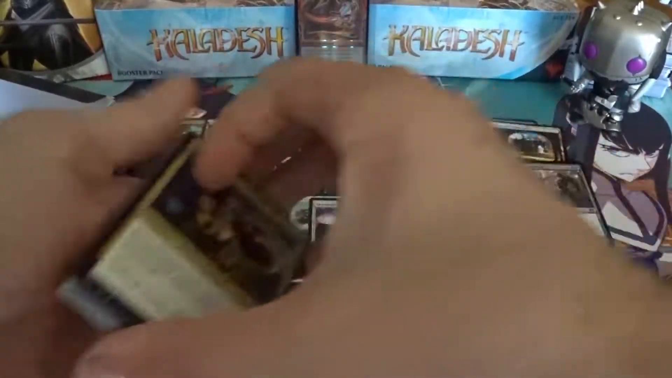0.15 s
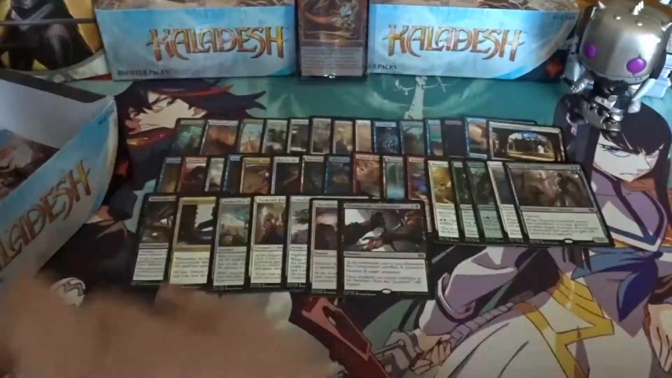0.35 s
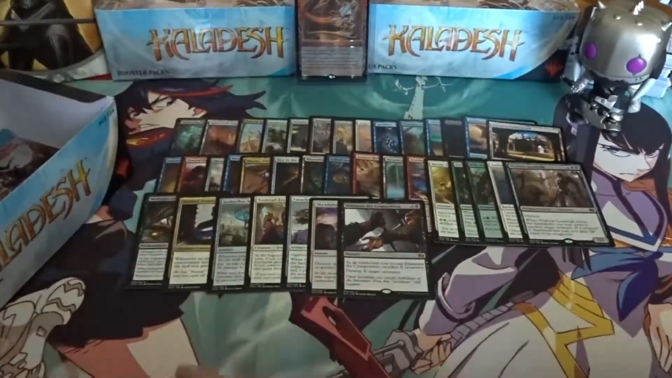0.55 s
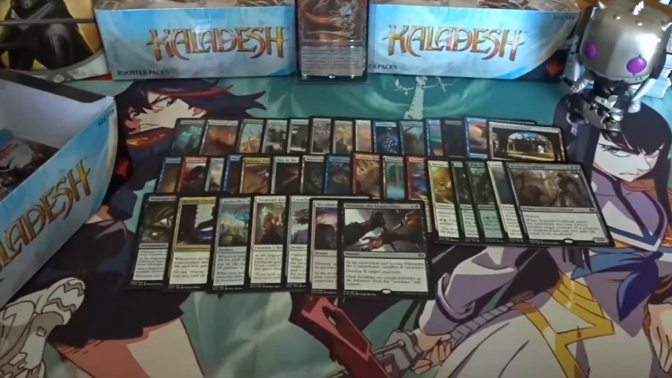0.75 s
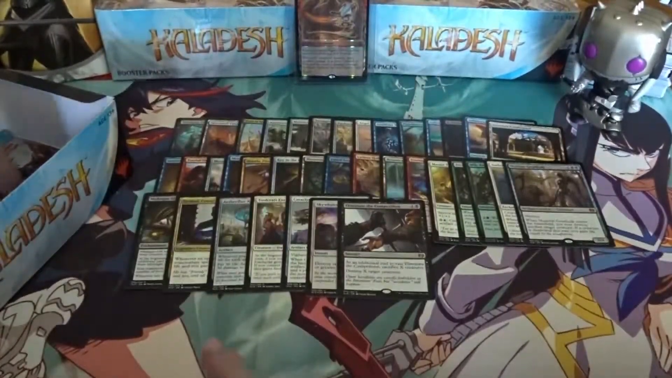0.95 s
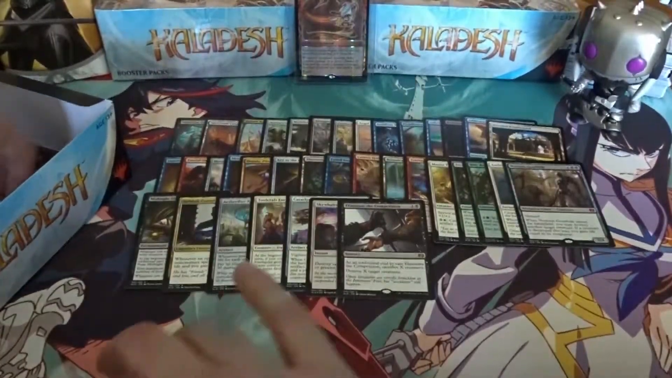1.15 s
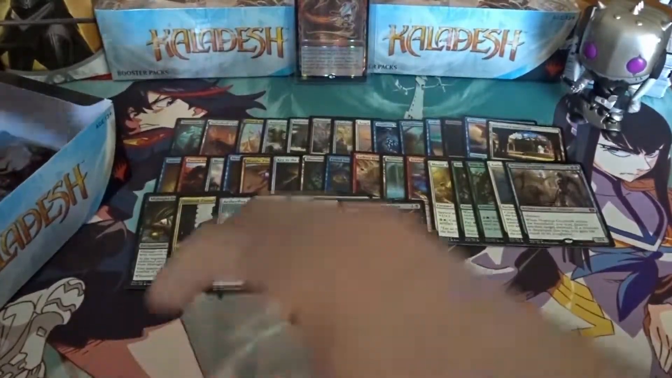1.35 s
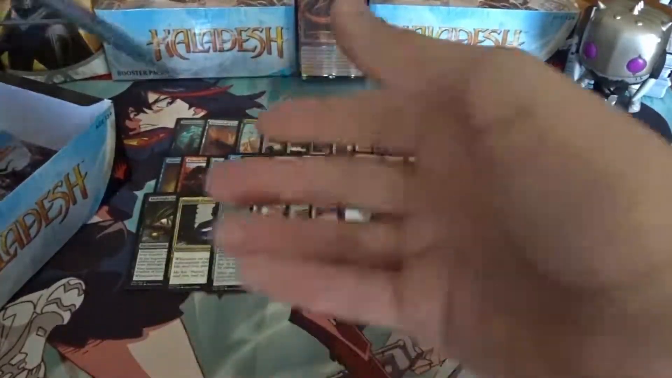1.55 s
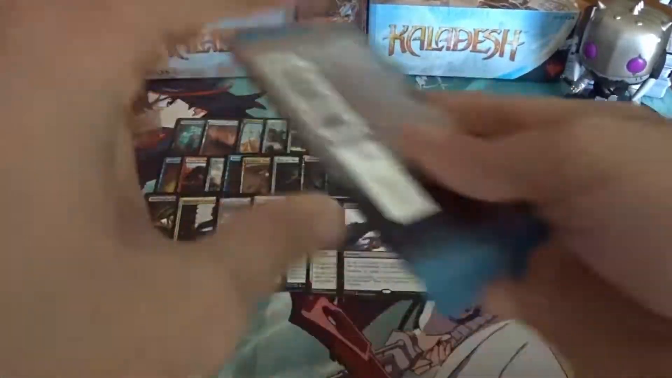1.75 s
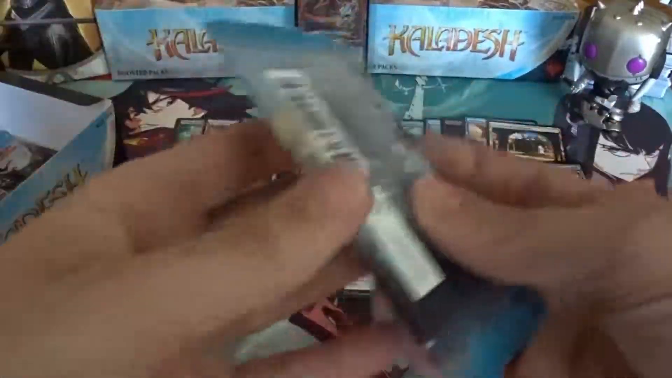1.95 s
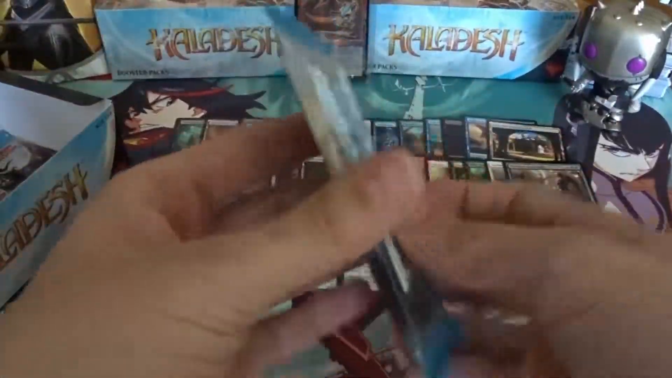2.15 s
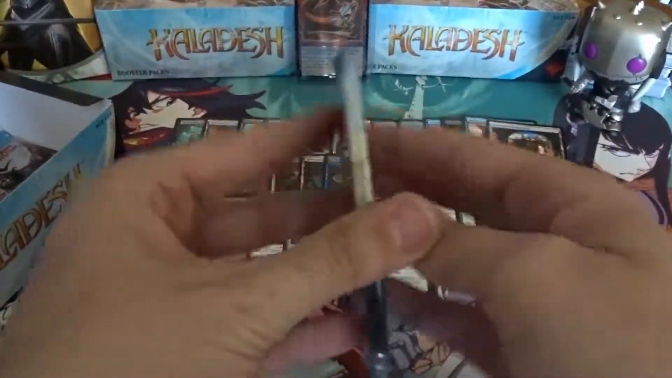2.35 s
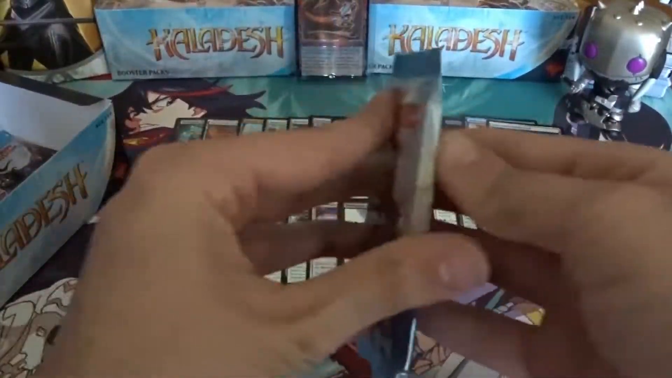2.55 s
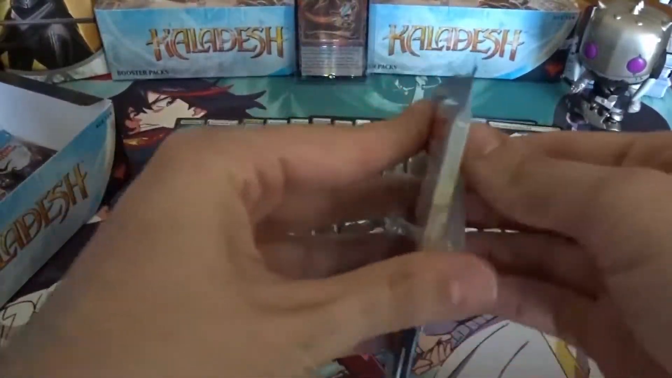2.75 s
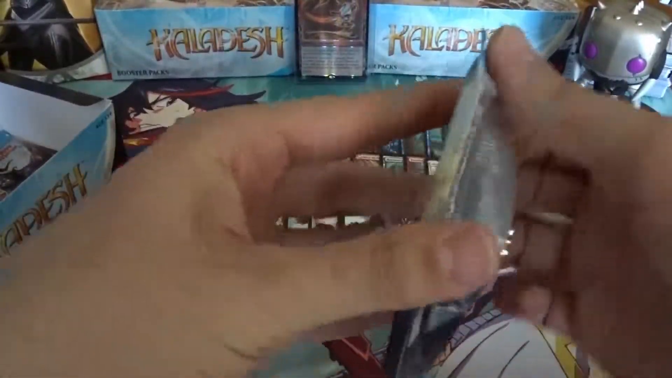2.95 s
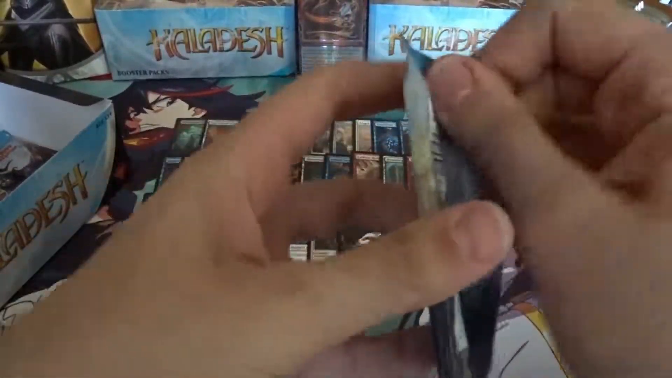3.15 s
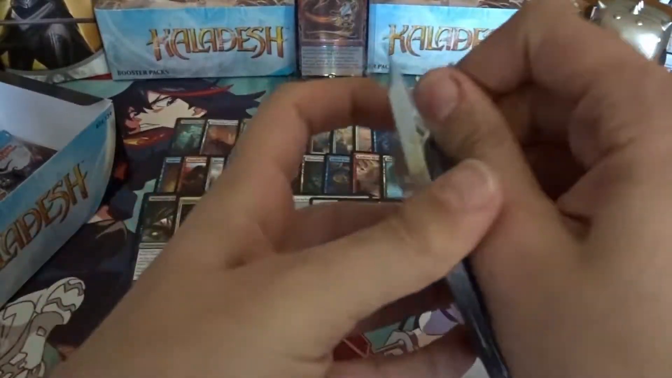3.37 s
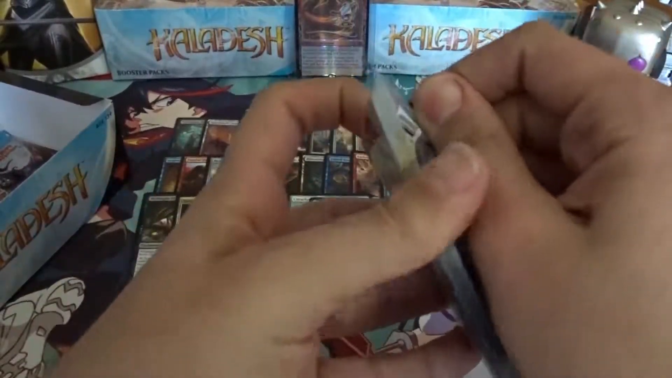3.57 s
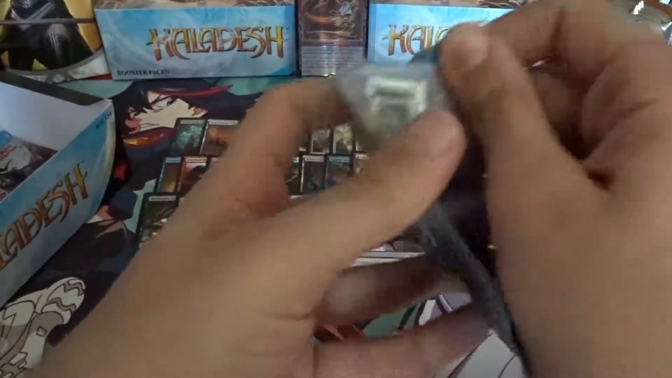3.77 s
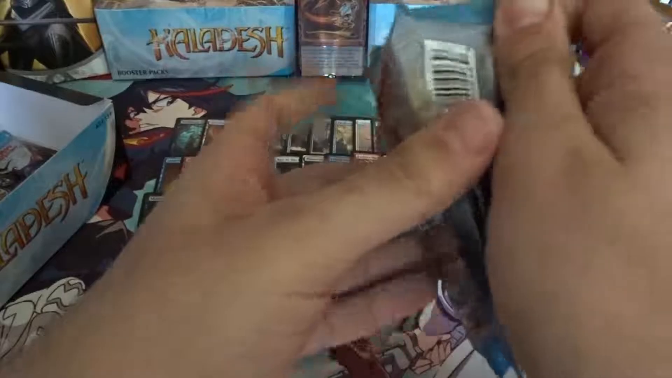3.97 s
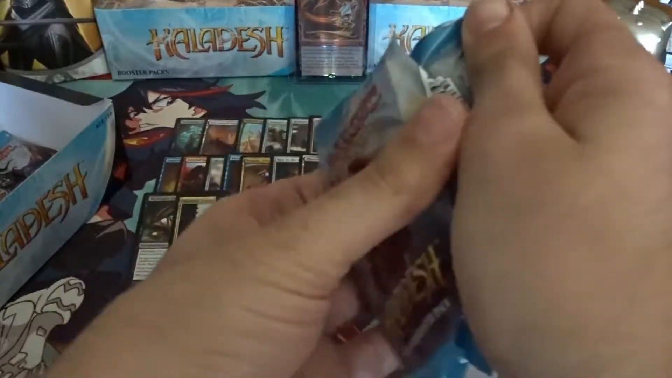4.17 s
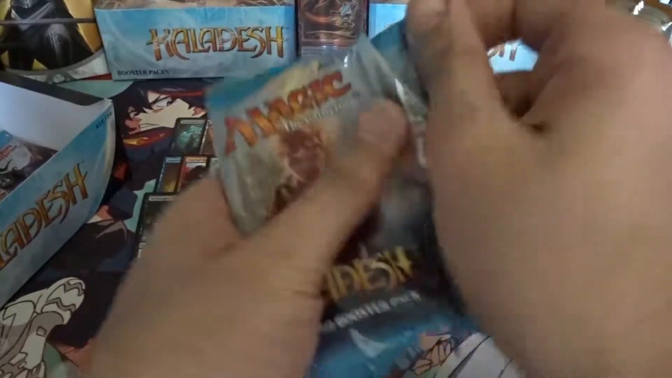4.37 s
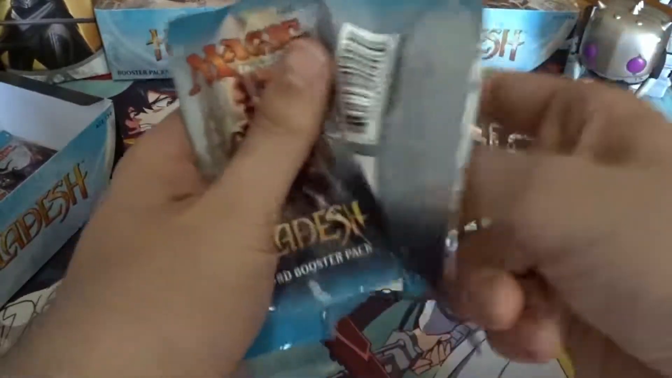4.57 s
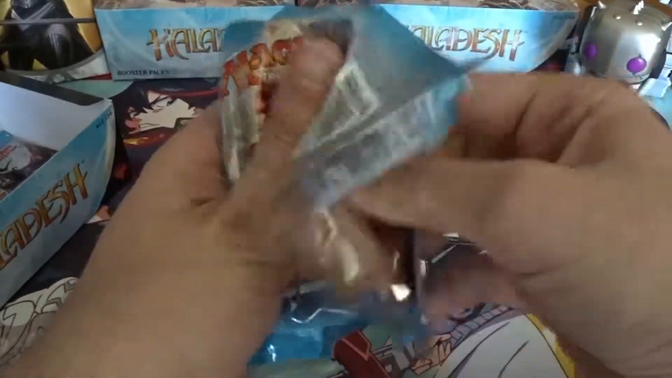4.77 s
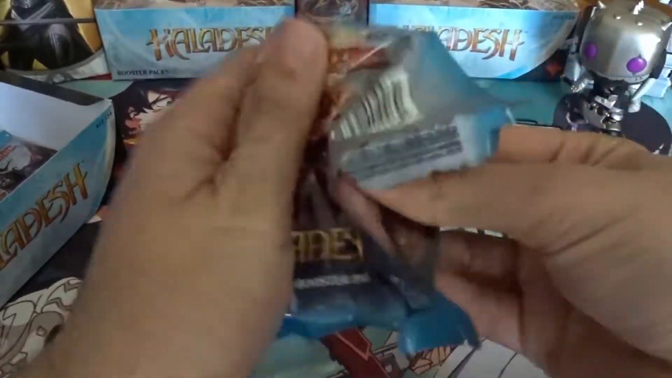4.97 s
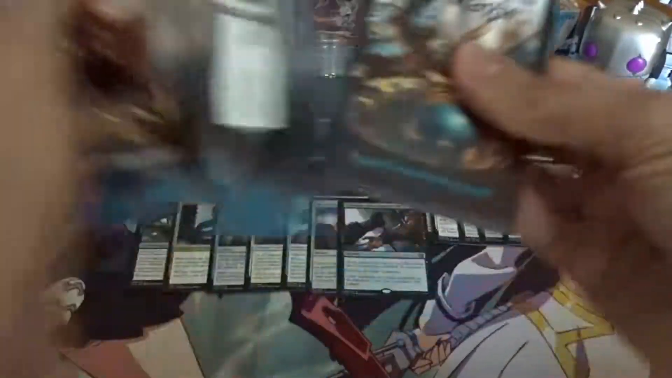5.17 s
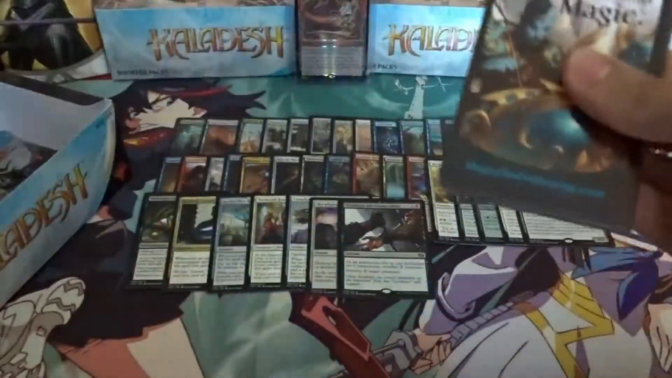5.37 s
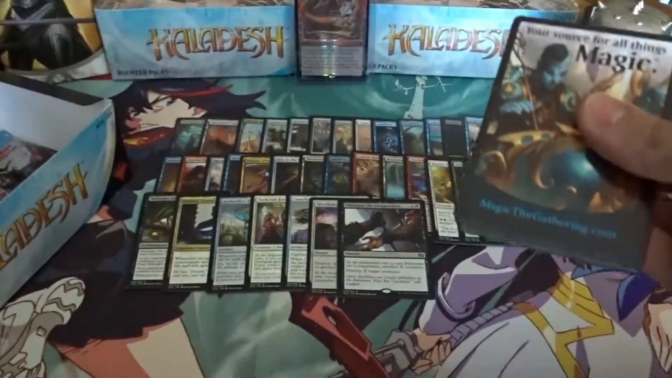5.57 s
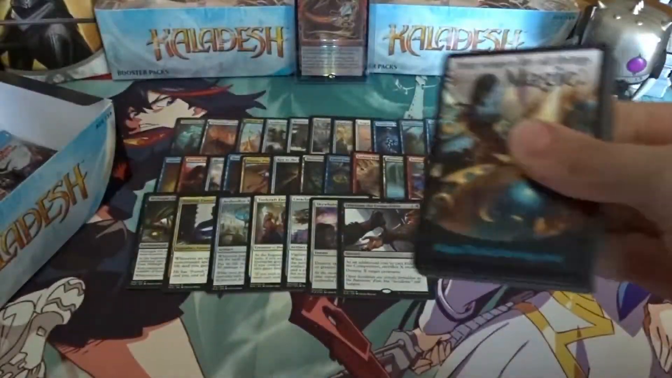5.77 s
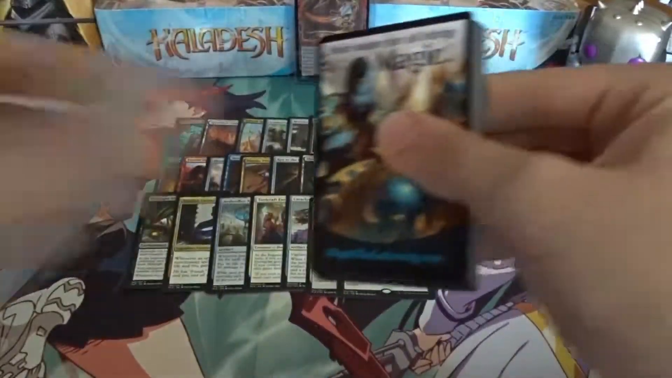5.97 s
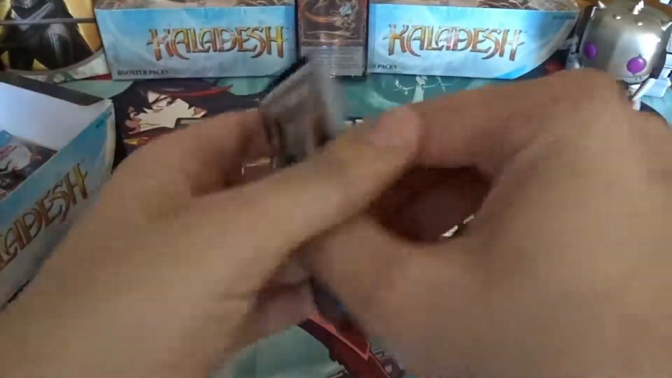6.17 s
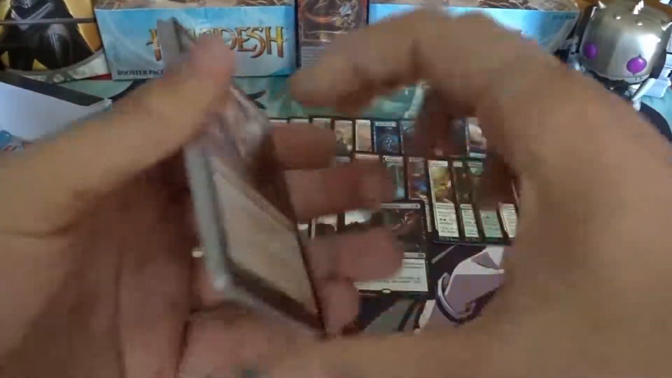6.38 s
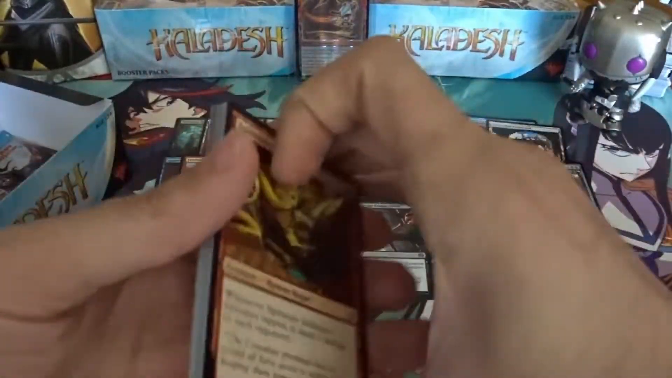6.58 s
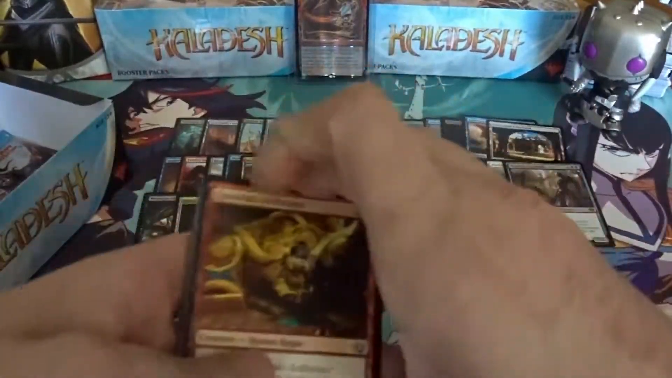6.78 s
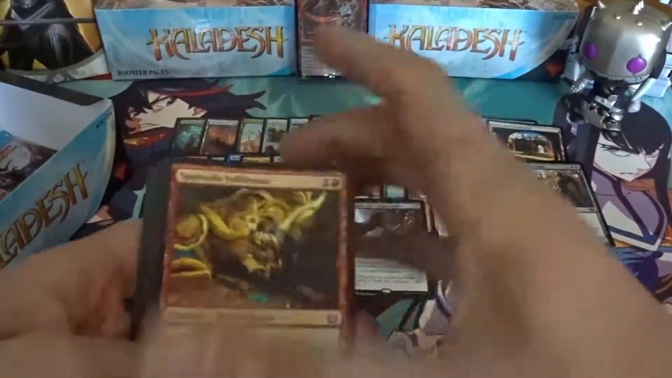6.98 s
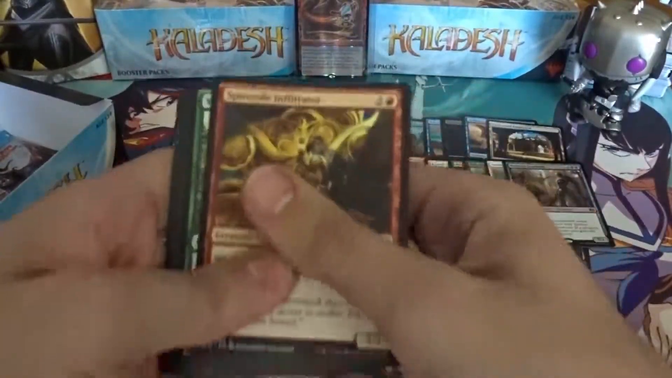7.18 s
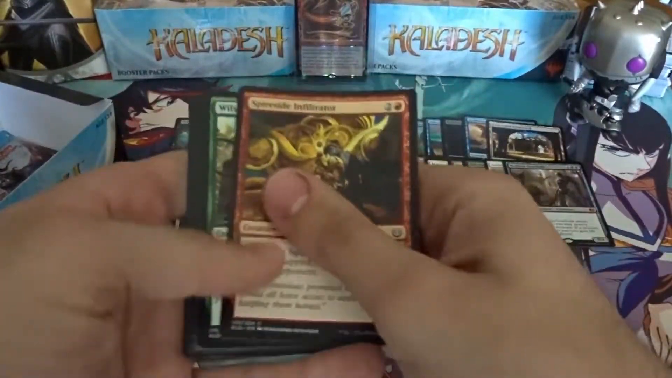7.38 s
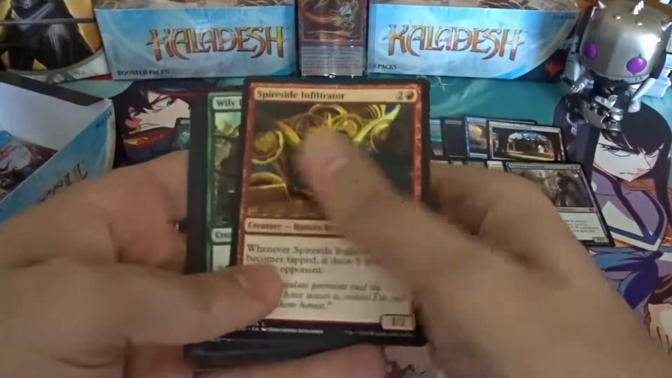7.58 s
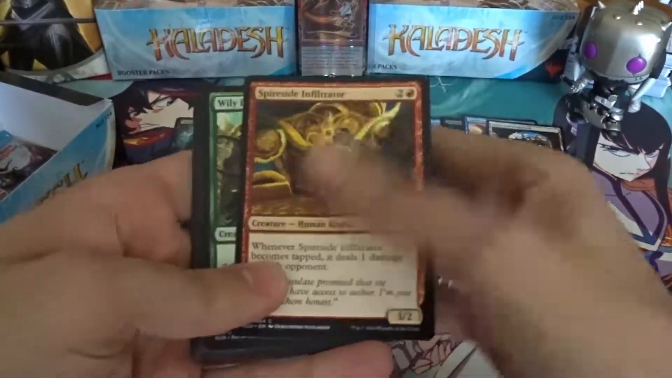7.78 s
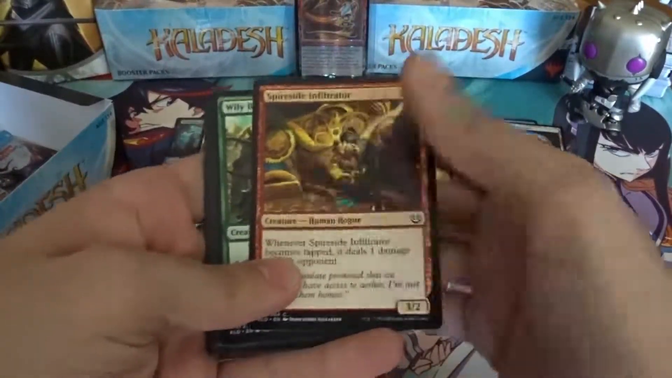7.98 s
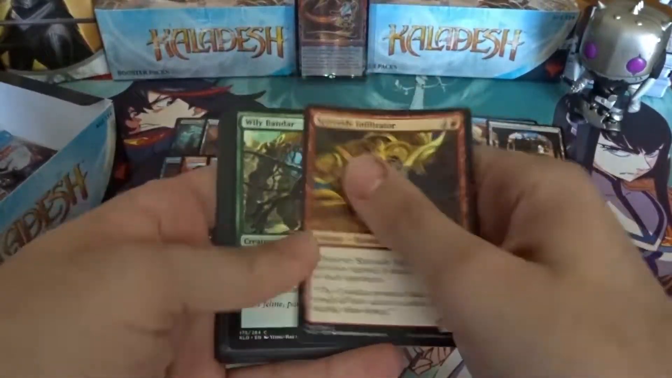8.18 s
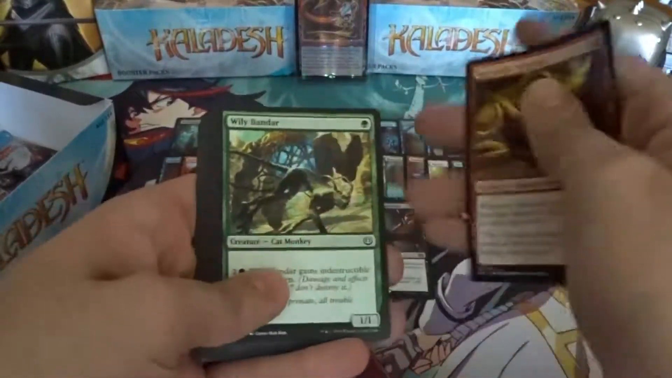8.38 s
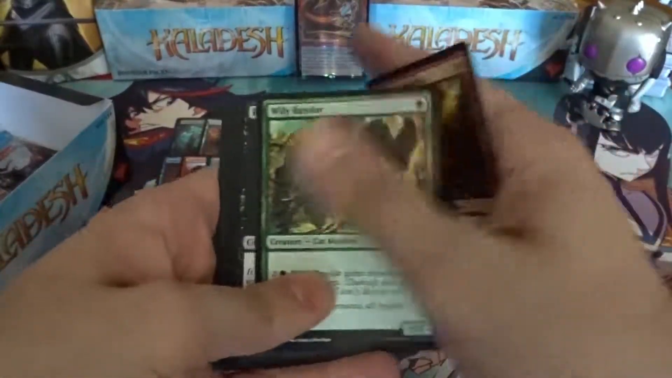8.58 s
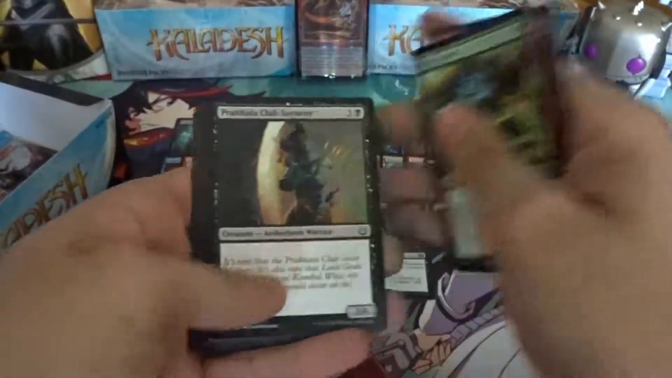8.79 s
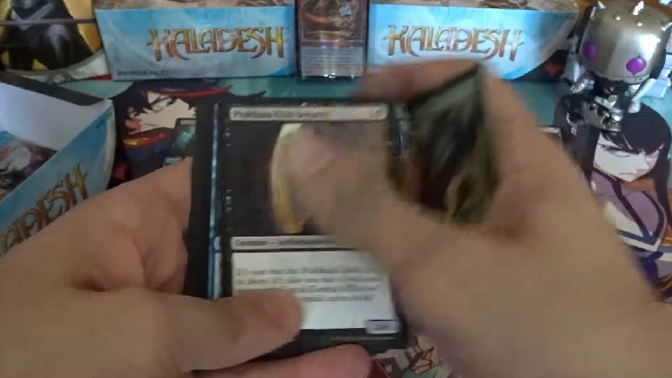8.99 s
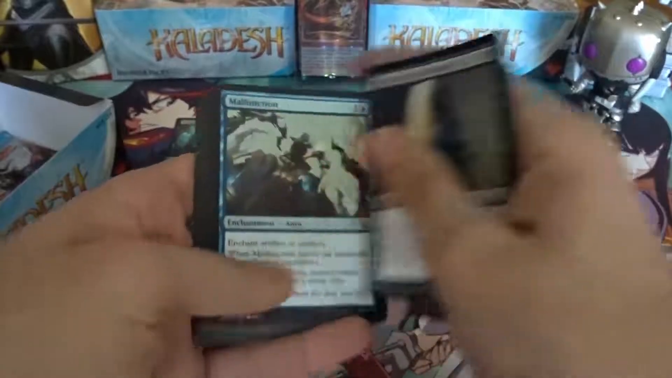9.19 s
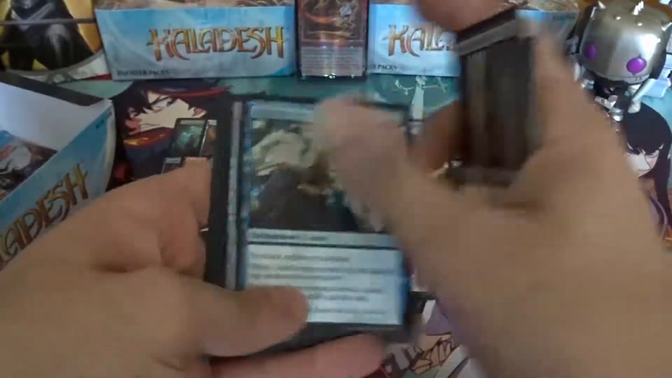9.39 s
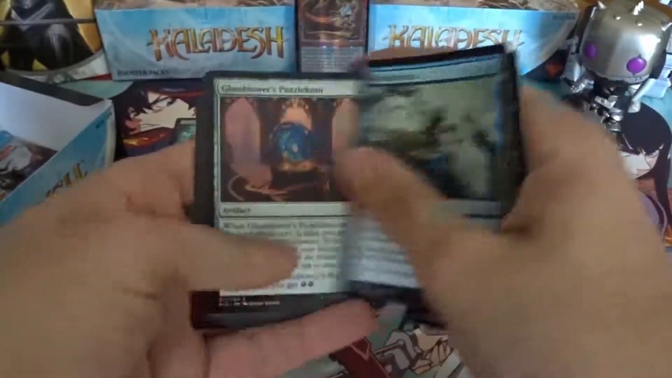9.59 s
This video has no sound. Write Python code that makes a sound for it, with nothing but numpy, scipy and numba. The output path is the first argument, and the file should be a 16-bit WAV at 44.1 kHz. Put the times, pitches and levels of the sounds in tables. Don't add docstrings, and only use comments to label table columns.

```python
import sys
import numpy as np
from scipy import signal
from scipy.fft import rfft, irfft, next_fast_len
from scipy.io import wavfile
from scipy.ndimage import uniform_filter1d, map_coordinates
from numba import njit

SR = 44100
rng = np.random.default_rng(int(sys.argv[2]) if len(sys.argv) > 2 else 0)


def persist_wave(psi):
    counts = np.round(np.clip(psi, -1, 1) * 32767).astype(np.int16)
    wavfile.write(sys.argv[1], SR, np.atleast_2d(counts).T)


def ratio(d):
    e = np.asarray(d, float) / 20
    return 10 ** e


N = 425124

# (frequency [Hz], density [dB per Hz])
AIR_SPECTRUM = [(15, -57.5), (40, -14.5), (113, -14), (250, -1.5), (361, -16), (500, -7), (620, -7.5),
                (1150, -17.5), (2200, -21.5), (5200, -27.5), (7200, -29), (15800, -44.5)]
# (frequency [Hz], level [dB])
FAN_TONES = [(511, -62), (1529, -77)]
# (frequency [Hz], gain [dB])
FOIL_SPECTRUM = [(300, -6.5), (600, -8.5), (1200, -4), (2500, -1), (4000, 2.5), (7000, 4.5), (11000, 4),
                 (15500, -1.5)]
# (start [s], hold [s], crackle level [dB], body share [dB])
TOUCHES = [(0.0, 0.03, -40.5, -11), (0.098, 0.06, -46, -6.5), (0.22, 0.055, -45, -7),
           (1.788, 0.56, -65, 13), (2.111, 0.045, -33, -10), (2.207, 0.11, -33.5, -3),
           (2.353, 0.086, -34, -1), (2.805, 0.12, -45.5, -1), (3.134, 0.084, -45, -4),
           (3.261, 0.089, -35, -16), (3.392, 0.091, -37, -10.5), (3.549, 0.075, -33.5, -9),
           (3.65, 0.15, -44.5, -36), (3.872, 0.097, -39.5, -13.5), (4.703, 0.13, -45.5, -11),
           (8.002, 0.746, -50.5, 1), (8.076, 0.02, -36, 3.5), (8.355, 0.052, -46, 0.5),
           (8.623, 0.05, -49.5, 3.5), (9.189, 0.058, -51, -14), (9.559, 0.06, -46, -13)]
# (start [s], hold [s], crackle level [dB], body share [dB])
PULLS = [(3.971, 0.12, -21.5, -23.5), (4.112, 0.1, -21.5, -24), (4.257, 0.21, -18.5, -28),
         (4.528, 0.14, -28, -25), (4.848, 0.04, -33.5, -43), (4.943, 0.12, -25, -19),
         (5.234, 0.26, -26, -9.5), (5.623, 0.05, -17.5, -30), (5.674, 0.064, -17, -13.5),
         (5.914, 0.09, -16, -9.5), (6.101, 0.14, -24.5, -20), (6.282, 0.027, -21.5, -7.5),
         (6.37, 0.24, -24.5, -9), (6.59, 0.17, -31, -9.5), (6.781, 0.061, -22.5, -3),
         (6.92, 0.28, -28.5, -3), (7.257, 0.15, -30.5, 2.5), (7.475, 0.43, -25, -12),
         (7.607, 0.17, -21, -2.5), (7.796, 0.057, -15.5, -2.5), (7.923, 0.086, -36, -2)]
# (time [s], level [dB])
GRIP = [(0.0, -55), (1.85, -56), (2.25, -48), (2.28, -40), (2.76, -59), (2.79, -37), (2.9, -59.5),
        (7.76, -45), (7.866, -26), (7.968, -53.5), (9.64, -54)]
# (time [s], peak level [dB], pitch [Hz])
KNOCKS = [(0.394, -33.5, 275), (1.077, -34.5, 890), (2.1292, -21, 845), (2.27, -22, 855),
          (2.2976, -14, 920), (2.442, -36, 1860), (2.7884, -20, 595), (3.3428, -20.5, 900),
          (4, -17.5, 1078), (4.06, -16, 1057), (4.4401, -13, 1000), (4.93, -17.5, 1010),
          (5.4554, -15.5, 1096), (5.9198, -15, 1070), (6.2246, -15, 1127), (6.4801, -12, 920),
          (6.5238, -6.5, 706), (6.701, -12, 1005), (7.1508, -11.5, 1090), (7.2638, -16, 840),
          (7.3013, -12.5, 1000), (7.3747, -9.5, 770), (7.7164, -11.5, 810), (7.867, -11, 650),
          (8.0835, -23, 298), (2.108, -32, 298), (2.293, -32, 327), (2.444, -27.5, 323), (7.409, -35, 110),
          (6.52, -24, 248)]
# (time [s], peak level [dB], pitch [Hz], fizz share [dB])
TURNED = [(0.0466, -23.5, 5600, -13), (0.2013, -30.5, 2560.0, -15), (1.0791, -35.5, 3970, -31.0),
          (2.4425, -16, 1980, 1), (2.7877, -23, 1700.0, -2), (2.792, -24.5, 1700.0, 1),
          (2.8082, -19, 8870.0, 11), (2.8146, -20.5, 1830.0, -4), (2.8222, -15, 8590.0, -10.0),
          (3.0977, -31, 1650, -15), (3.2682, -14, 5040.0, -15.5), (3.2922, -17.5, 4820.0, -10),
          (3.312, -13, 5470.0, -5.5), (3.3255, -19, 5840.0, 9), (3.3448, -13.5, 5700, -1),
          (3.375, -11, 5300, -13), (3.4132, -6.5, 5330, -15), (3.4208, -5, 6740, -5),
          (3.5596, -11.5, 8570.0, -4), (3.5774, -9.5, 7970.0, -13.5), (3.8408, -23.5, 4240.0, -8),
          (3.8645, -27.5, 7000, 0), (3.9256, -20.5, 8870.0, -6.5)]
TORN = [(3.9424, -21.5, 1940.0, -13), (3.9566, -7.5, 8530.0, 1.5), (4.0074, -2, 6960.0, -10.5),
        (4.0176, -6, 7040.0, -7.5), (4.022, -2.5, 6180.0, -10), (4.0825, -10, 7130.0, -6.5),
        (4.2652, -5, 7600.0, -8.5), (4.3682, -6.5, 4480.0, 2), (4.3771, 3, 5100.0, -15),
        (4.407, -2.5, 5400.0, -14), (4.4302, -5, 6780.0, 4), (4.4377, -7.5, 1700.0, -12.5),
        (4.4802, -6.5, 2350.0, -5.0), (4.4901, 0, 5490.0, -13.5), (4.534, -7, 1870.0, -16),
        (4.5755, -11.5, 9500.0, 6.5), (4.6016, -18, 8250.0, 4.5), (4.6111, -1, 3700.0, -9),
        (4.6322, -15.5, 1700.0, 9), (4.653, -14.5, 1700.0, 4)]
PEELED = [(4.717, -19.5, 3400, -13.0), (4.7207, -27, 1700.0, -11.5), (4.759, -13, 5250.0, -14.5),
          (4.7735, -19, 5320.0, -10), (4.7814, -21.5, 5900.0, -8.0), (4.8156, -26.5, 9370.0, 9.5),
          (4.8227, -20.5, 9500.0, 12), (4.8298, -17.5, 5900, 0), (4.8409, -24.5, 3800, 5.5),
          (4.9338, -10.5, 9500.0, 12), (5.0212, -16, 6850.0, 7), (5.0259, -7.5, 2964, 2),
          (5.062, -7.5, 3025, -15), (5.0944, -12.5, 7230, -7.0), (5.1159, -6, 3570, 0),
          (5.1418, -12.5, 1720, 0), (5.1492, -15.5, 4130.0, 8.5), (5.1757, -7.5, 5960.0, -4),
          (5.2664, -1.5, 5376, -23.0), (5.2724, -3, 5370, -11.5), (5.2777, -8, 5940.0, -3.5),
          (5.2857, -6.5, 3250.0, -16.5), (5.3015, -6.5, 7300, 1.5), (5.3085, -4.5, 2520, -5.5),
          (5.3243, -12, 1700.0, -1), (5.3412, -11.5, 1720, -17.5), (5.346, -4.5, 6900, -14),
          (5.36, -6, 4200, -10), (5.3636, -12.5, 4310.0, -4), (5.386, -10, 2980, 4),
          (5.3954, -2.5, 3080, -3.5), (5.438, -7, 4410.0, 0), (5.4431, -0.5, 4100, -11),
          (5.455, -5.5, 4520.0, -5), (5.464, -6, 3660, -11.5), (5.469, -3.5, 5170.0, -17),
          (5.5018, -16, 6540, -8.5), (5.5257, -3, 6700, -15.5)]
EMPTIED = [(5.5668, -11, 6780.0, 1), (5.5772, -7.5, 3706, -20), (5.5918, -2, 2390, -15.5),
           (5.5976, -7.5, 2424, -5.5), (5.6198, -3, 3617, -9.5), (5.6618, -2, 2890, -16.5),
           (5.6768, -2, 5920.0, -5.5), (5.7539, -9.5, 7030, -10.5), (5.7765, -2, 5950, -8),
           (5.808, -12.5, 6900, -6.5), (5.872, -8, 2215, -17), (5.879, -2.5, 6030, -11.0),
           (5.8937, -1, 5560, -16), (5.9506, -4.5, 5660.0, -9), (6.001, -4.5, 6980.0, -6.0),
           (6.0098, -8.5, 1750, -4.5), (6.0165, -8.0, 6960.0, -4.5), (6.0383, -7, 3930, -18),
           (6.0741, -15, 3850.0, -18.5), (6.0852, -12.5, 3140, -12), (6.1004, -12.5, 4240.0, -10.0),
           (6.1058, -9.5, 9500.0, 0.5), (6.1102, -6, 6140, -6.5), (6.1275, -9.5, 3970, -5),
           (6.149, -11, 6360, -4.5), (6.159, -9.5, 7560.0, -10), (6.1654, -3.5, 5500, -12.5),
           (6.2016, -3, 5020.0, -15), (6.2235, -8.5, 4390.0, -7.5), (6.229, -7, 6210, -16.0)]
FOLDED = [(6.261, -13, 8890.0, -1), (6.2929, -6.5, 3750, -21.5), (6.298, -6, 5200, -16),
          (6.3872, -4, 4650.0, -3.5), (6.3974, -9.5, 5500, -9.0), (6.4662, -5, 8910.0, -5),
          (6.4864, -8, 5280.0, -11.5), (6.518, -4, 5960.0, -5.5), (6.5228, -6.5, 6030.0, -5),
          (6.5715, -3.5, 4600, -13), (6.598, -7, 4440, -16.0), (6.6102, -7.5, 8790.0, -5),
          (6.6269, -7, 3770, -9.0), (6.631, -4.5, 7150, -12), (6.635, -6, 6100, -6.0),
          (6.6472, -5.5, 6200, -3), (6.6637, -3.5, 5750, -16), (6.7034, -3, 4770, -3),
          (6.7512, -8.5, 6140.0, -1.5), (6.7573, -9, 6030.0, -12.0), (6.8291, -5, 3840, -21.5),
          (6.8459, -8, 2860, -13.0), (6.8733, -8.5, 5400, -4)]
CRUSHED = [(6.9143, -16, 3850.0, -14.5), (6.927, -11.5, 8300, 8), (6.9322, -10.5, 3750.0, -15.5),
           (6.9412, -9, 4670.0, 2.5), (6.955, -12, 4520, 8), (6.9785, -12, 8050.0, 1),
           (6.9929, -8, 5280.0, -5), (7.0065, -3.5, 4610.0, 5), (7.0232, -6.0, 4870, 0.5),
           (7.1107, -1.5, 5300, -12), (7.2403, -12.5, 9500.0, -1), (7.255, -14.5, 8720.0, -6),
           (7.263, -10, 6180.0, 2), (7.3372, -19, 8910.0, -3.5), (7.3541, -2.5, 5600, -9.5),
           (7.3738, -4.5, 7200, -21), (7.4138, -13, 8180.0, -2), (7.4236, -3, 7800, -22),
           (7.4647, -6.0, 7800.0, -8), (7.478, -9.5, 6650.0, -14.5), (7.4806, -5, 4890.0, -6.5),
           (7.486, -9, 2310, 2), (7.4943, -16.5, 8550.0, -6.0)]
DROPPED = [(7.5115, -12.5, 3830.0, -9), (7.524, -5.0, 5360.0, -4), (7.533, -2, 4700, -7.5),
           (7.5531, -4.5, 3320.0, -14.0), (7.5642, -3.5, 3700, -3), (7.577, -9, 4570, -1),
           (7.5954, -11, 1790.0, -13.5), (7.6312, -3, 1830.0, -5), (7.6492, -5.0, 2480, -14),
           (7.6706, -11, 3620.0, -10), (7.6797, -8, 2690.0, -12.5), (7.688, -2, 3660.0, -14),
           (7.6953, -5, 7410.0, -7), (7.7412, -4, 4480.0, -14.5), (7.765, -3.5, 3550.0, -5),
           (7.9404, -12.0, 2370.0, -22.5), (7.956, -12.5, 3850, -26.0)]
# (time [s], peak level [dB], pitch [Hz])
BURIED = [(3.994, -4, 6390), (4.0371, -5.5, 5330), (4.0606, -7.5, 6810), (4.143, -5.5, 8000),
          (4.3178, -6, 4650), (4.852, -11, 9030), (5.1269, -5, 3320), (5.8221, -6.5, 3540),
          (5.9136, -7.5, 6800), (5.978, -6, 6550)]
# (time [s], peak level
# [dB], pitch [Hz])
FLICKS = [(0.224, -28, 5800), (0.3815, -26, 5400), (0.522, -38, 8000), (1.14, -34, 4900),
          (1.797, -43, 2500), (2.884, -19, 5360), (3.138, -32, 3040), (3.184, -26, 4430),
          (7.7167, -2.5, 2600), (8.269, -25.5, 1890), (8.36, -27, 4850), (8.369, -31, 5600),
          (8.4069, -23.5, 1910), (8.414, -30, 5200), (8.5262, -23.5, 2050), (8.534, -21, 5740),
          (9.1784, -32.5, 4520), (9.333, -29.5, 4760)]
# (start [s], end [s], level [dB], patch pitch [Hz])
RUBS = [(0.286, 0.301, -38, 5850), (0.382, 0.402, -36, 6300), (1.27, 1.348, -57, 1660),
        (2.101, 2.162, -33.5, 3940), (2.184, 2.26, -34.5, 3930), (2.103, 2.151, -34, 7350),
        (2.197, 2.266, -32, 7300), (2.346, 2.394, -28.5, 6370), (3.739, 3.767, -30, 8550),
        (4.038, 4.06, -15.5, 6790), (4.099, 4.139, -21, 4100), (4.136, 4.181, -12.5, 4400),
        (4.182, 4.209, -18.5, 4640), (5.111, 5.121, -20, 3655), (5.628, 5.659, -16, 3640),
        (5.705, 5.724, -20.5, 7470), (4.218, 4.256, -14, 6484), (4.328, 4.355, -12, 6340),
        (4.852, 4.862, -19, 9360), (4.984, 5.002, -16, 7030), (5.804, 5.85, -19, 6480)]
# (start [s], end [s], pitch [Hz], width [Hz], level [dB])
POCKETS = [
    (2.26, 2.474, 870, 110, 8),
    (2.214, 2.487, 360, 56, -2.5),
    (3.4, 3.49, 2350, 130, -2),
    (4.52, 5.474, 1543, 190, 3),
]
# (start [s], end [s], first rate [Hz], last rate [Hz], level [dB])
SQUEAKS = [
    (3.773, 3.801, 2148, 1516, -28.5),
    (7.04, 7.057, 874, 867, -14.5),
    (7.056, 7.068, 1376, 1340, -10),
    (7.066, 7.099, 1198, 1105, -14.5),
    (7.124, 7.145, 1021, 854, -13.5),
]
# (start [s], end [s], tick rate [1/s], peak level [dB], pitch [Hz])
PEELS = [(4.541, 4.559, 400, -11, 8500), (4.868, 4.93, 345, -11, 10000), (5.186, 5.197, 500, -12, 5170),
         (5.198, 5.219, 270, -15, 5210), (5.245, 5.264, 360, -12, 5500), (6.353, 6.392, 290, -15, 10500),
         (6.785, 6.8, 370, -10.5, 11900), (6.8, 6.827, 430, -9.5, 12200)]


@njit
def grains(start, hz, width, tail, rattle, size, noise):
    out, buf = np.zeros(len(noise)), np.zeros(4096)
    for e in range(len(start)):
        n = int(min(4096, len(out) - start[e], tail[e] * SR + 2 * SR / width[e]))
        g, k = np.tan(np.pi * hz[e] / SR), width[e] / hz[e]
        fade = 1000. ** (-1 / (tail[e] * SR))
        band, low, env, peak = 0., 0., rattle[e], 1e-9
        for i in range(n):
            x = env * noise[start[e] + i] + (i == 0)
            v = (band + g * (x - low)) / (1 + g * (g + k))
            band, low = 2 * v - band, low + 2 * g * v
            buf[i] = v
            env *= fade
            peak = max(peak, abs(v))
        for i in range(n):
            out[start[e] + i] += buf[i] * size[e] / peak
    return out


def play(s, hz, sharp, tail_s, rattle, db):
    hz = np.clip(hz, 60, 0.4 * SR) + 0 * s
    start = np.clip(s * SR, 0, N - 1).astype(np.int64)
    noise = rng.standard_normal(N)
    return grains(start, hz, hz / sharp, tail_s + 0 * s, rattle + 0 * s, ratio(db), noise)


def colour(x, spectrum):
    hz, db = np.transpose(spectrum)
    n = next_fast_len(len(x))
    f = np.log(np.arange(n // 2 + 1) * SR / n + 1)
    return irfft(rfft(x, n) * ratio(np.interp(f, np.log(hz), db)), n)[:len(x)]


def walk(rate):
    k = int(SR / rate)
    steps = np.repeat(rng.standard_normal(N // k + 1), k)
    return uniform_filter1d(steps, k // 2)[:N]


def hush():
    air = colour(rng.standard_normal(N), AIR_SPECTRUM)
    air = air + 0.9 * signal.lfilter(*signal.iirpeak(5200, 7.0, SR), air)
    air = air * ratio(-56.5 + 0.24 * walk(0.93)) / air.std()
    tones = 0
    for hz, db in FAN_TONES:
        wavering_hz = hz * (1 + 0.008 * walk(30))
        phase = 2 * np.pi * np.cumsum(wavering_hz) / SR
        tones = tones + ratio(db + 4.2 * walk(23)) * np.sin(phase)
    return air + tones


def effort(s):
    attack_db_per_s, release_db_per_s = 906, 328
    sag_db_per_s = 6.5
    rest_db, rest_body_db = -70, 8
    start, hold, db, body_db = np.transpose(TOUCHES + PULLS)[:, :, None]
    t = np.arange(0, N / SR, 0.002)
    fall_db = attack_db_per_s * np.maximum(start - t, 0)
    fall_db = fall_db + release_db_per_s * np.maximum(t - start - hold, 0)
    fall_db = fall_db + sag_db_per_s * np.clip(t - start, 0, hold)
    power, rest = ratio(db - fall_db) ** 2, ratio(rest_db) ** 2
    total = power.sum(axis=0) + rest
    body = ((power * body_db).sum(axis=0) + rest * rest_body_db) / total
    return np.interp(s, t, 10 * np.log10(total)), np.interp(s, t, body)


def patches(s, hz):
    field = rng.standard_normal((22, 800))
    field = uniform_filter1d(uniform_filter1d(field, 2, axis=0), 3, axis=1)
    return map_coordinates(field / field.std(), [3 * np.log2(hz / 200), s * 799 * SR / N], order=1)


def crackle(count=36000):
    chance = rng.random((count, 4)).T
    s = np.sort(chance[0]) * N / SR
    level_db, body_db = effort(s)
    fizz_db = -8 - 0.19 * body_db
    hz = 350 * (16000 / 350) ** chance[1]
    low = np.clip(np.log2(3000 / hz) / 1.36, 0, 1)
    high = np.clip(np.log2(hz / 6000) / 0.12, 0, 1)
    tilt_db = low * (body_db + 8.0) + high * (fizz_db + 2.5)
    burst_db = (2.2 * walk(35) + 1.5 * walk(200))[(s * SR).astype(int)]
    size_db = -2.6 * np.log(1 - chance[3]) + 4.5 * patches(s, hz)
    size_db = np.minimum(burst_db + size_db, 11)
    energy_db = 10 * np.log10(hz / 4000) - 6.5
    db = level_db + tilt_db + size_db + energy_db
    return colour(play(s, hz, 4.04 + 1.77 * chance[2], 0.0042, 0.14, db), FOIL_SPECTRUM)


def ticks(count=1800):
    chance = rng.random((count, 3)).T
    s = chance[0] * N / SR
    db = 1.3 * effort(s)[0] + 11.0 - 4.0 * np.log(1 - 0.8 * chance[1])
    hz = 2200 * 5.97 ** chance[2]
    return play(s, hz, 0.75, 0.0062, 0.16, db)


def knocks():
    s, db, hz = np.transpose(KNOCKS)
    rumble = colour(rng.standard_normal(N),
                    [(30, -21.5), (70, -20.5), (160, 0.5), (300, 3.5), (450, -1.0), (900, -30.5)])
    rumble_db = np.interp(np.arange(N) / SR, *np.transpose(GRIP)) + 2 * walk(40)
    rumble = rumble / rumble.std() * ratio(rumble_db - 4.0)
    return play(s, hz, 1.83, 0.021, 0.21, db + 0.5) + rumble


def snaps():
    buried = [row + (-8,) for row in BURIED]
    rows = TURNED + TORN + PEELED + EMPTIED + FOLDED + CRUSHED + DROPPED + buried
    s, db, hz, fizz_db = np.transpose(rows)
    spread = rng.standard_normal((len(s), 2)).T
    lower_hz = hz * 0.56 * 2 ** (0.61 * spread[0])
    upper_hz = np.minimum(hz * 1.84, 8000) * 2 ** (0.25 * spread[1])
    pitched = play(s, hz, 4.25, 0.0089, 0.27, db - 4.5)
    lower = play(s, lower_hz, 0.97, 0.011, 0.35, db - 13.0)
    upper = play(s, upper_hz, 2.1, 0.0061, 0.3, db - 6.5)
    fizz = play(s, 11900, 1.5, 0.0059, 0.42, db + fizz_db - 3.5)
    return colour(pitched + lower + upper + fizz, [(80, -23.5), (600, 3), (1500, 2.5), (20000, 1.0)])


def flicks():
    s, db, hz = np.transpose(FLICKS)
    edge = play(s, hz, 3.2, 0.025, 0.4, db - 5.5)
    paper = play(s, 6000, 0.53, 0.0089, 0.37, db - 5)
    return edge + paper


def rubs(per_s=5000):
    rows = []
    for t0, t1, db, hz in RUBS:
        for s in np.arange(t0, t1, 1 / per_s):
            swell_db = 6.5 * np.log10(np.sin(np.pi * (s - t0) / (t1 - t0)) + 0.23)
            rows.append([s, db + swell_db, hz])
    s, db, hz = np.transpose(rows)
    chance = rng.standard_normal((len(s), 3)).T
    at = (s * SR).astype(int)
    db = db + 2.5 * walk(120)[at]
    hz = hz * 2 ** (0.1 * walk(70)[at])
    s = s + chance[0] / per_s
    ringing = play(s, hz * 2 ** (0.035 * chance[1]), 4.1, 0.00058, 0.22, db - 6.0 + 2.4 * chance[2])
    scrape = play(s, hz * 2 ** (0.54 * chance[1]), 0.35, 0.0004, 0.18, db - 2.5 + 3.7 * chance[2])
    return ringing + scrape


def pockets(hands):
    t, out = np.arange(N) / SR, 0
    for t0, t1, hz, width_hz, db in POCKETS:
        opened = np.clip(np.minimum(t - t0, t1 - t) / 0.012, 0, 1)
        ring = signal.lfilter(*signal.iirpeak(hz, hz / width_hz, SR), hands * opened)
        out = out + ratio(db) * ring
    return out


def squeaks():
    slips, waver = [], walk(110)
    for t0, t1, first_hz, last_hz, db in SQUEAKS:
        u = np.linspace(0, 1, int((t1 - t0) * SR))
        glide_hz = first_hz + (last_hz - first_hz) * u
        hz = glide_hz * (1 + 0.04 * waver[int(t0 * SR):][:len(u)])
        slip = np.diff(np.floor(np.cumsum(hz) / SR), prepend=0) > 0
        swell_db = 8 * np.log10(np.sin(np.pi * u[slip] ** 0.56) + 0.34)
        slips.append([t0 + u[slip] * (t1 - t0), db + swell_db, hz[slip]])
    s, db, hz = np.hstack(slips)
    chance = rng.standard_normal((len(s), 2)).T
    s, db = s + 0.000022 * chance[0], db + 2.5 * chance[1]
    thin_db = 12 * (hz > 1450)
    body = play(s, np.maximum(hz, 900), 1.6, 0.0014, 0.029, db - 7.0 - thin_db)
    middle = play(s + 0.00015, 2550, 4, 0.0005, 0.04, db - 8 - thin_db)
    bright = play(s + 0.0003, 3740, 4.1, 0.0005, 0.038, db - 3)
    hiss = play(s + 0.0005, 5700, 3, 0.0012, 0.3, db - 8)
    return body + middle + bright + hiss


def peels():
    rows = []
    for t0, t1, per_s, db, hz in PEELS:
        for s in np.arange(t0, t1, 1 / per_s):
            rows.append([s, db, hz, per_s])
    s, db, hz, per_s = np.transpose(rows)
    chance = rng.standard_normal((len(s), 2)).T
    s, db = s + 0.12 * chance[0] / per_s, db + 2.5 * chance[1]
    ring = play(s, hz, 2.4, 0.00197, 0.38, db - 4.5)
    blink = play(s, hz, 3.1, 0.0011, 0.27, db - 16.5)
    crack = play(s, 8700, 1.2, 0.002, 0.24, db - 4.5)
    return ring + blink + crack


def reverberation(hands):
    t60_s, level_db = 0.2, -15.5
    t = np.arange(SR // 2) / SR
    tail = rng.standard_normal(len(t)) * 1000. ** (-t / t60_s) * (t > 0.003)
    tail = signal.lfilter(*signal.butter(1, [700, 4900], "band", fs=SR), tail)
    tail = tail / np.sqrt(np.sum(tail ** 2))
    return ratio(level_db) * signal.fftconvolve(hands, tail)[:N]


def scene():
    hands = crackle() + ticks() + knocks() + snaps() + flicks() + rubs() + squeaks() + peels()
    hands = hands + pockets(hands)
    return (hands + reverberation(hands) + hush())[None]


def roll_off(x):
    return signal.sosfilt(signal.butter(12, 17010, fs=SR, output="sos"), x)


def record(dry):
    top_hz, top_db = 15930, -52
    x = dry[0] / (1 + np.abs(dry[0] / 1.05) ** 4) ** 0.25
    x = colour(x, [(60, 0), (top_hz, 0), (top_hz + 120, top_db), (17000, top_db), (17100, -90)])
    mix = np.clip(x, -1, 1)[None]
    return roll_off(mix)


dry = scene()
out = record(dry)
persist_wave(out)
```